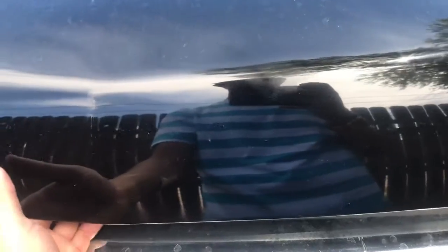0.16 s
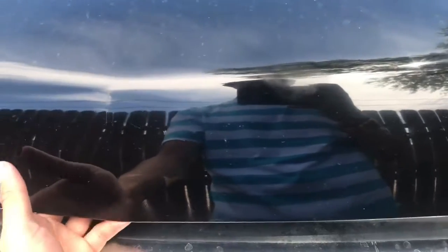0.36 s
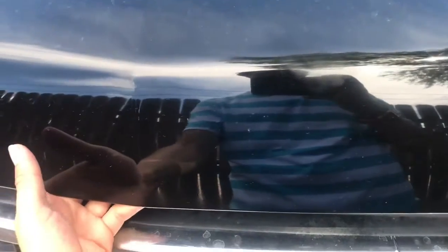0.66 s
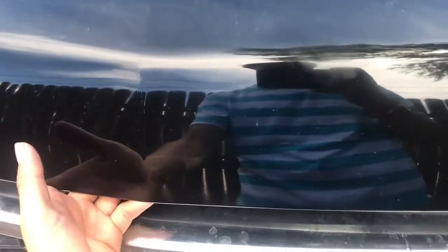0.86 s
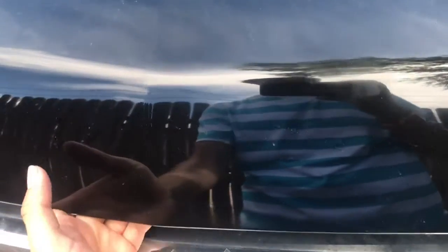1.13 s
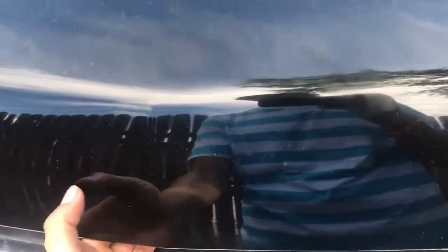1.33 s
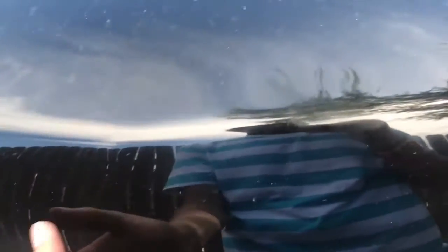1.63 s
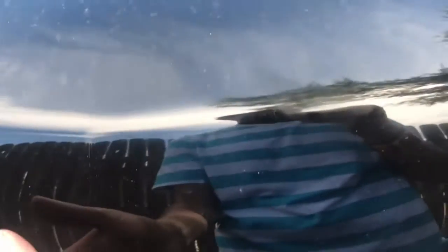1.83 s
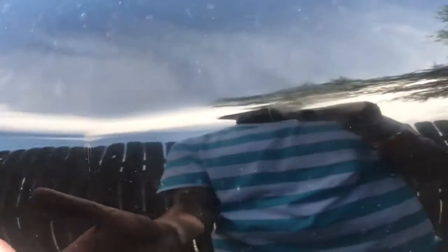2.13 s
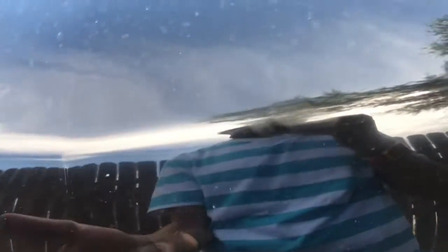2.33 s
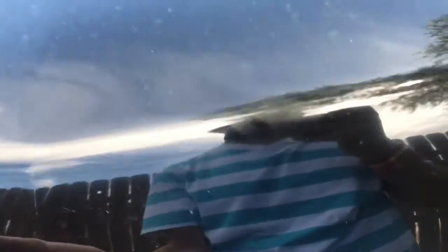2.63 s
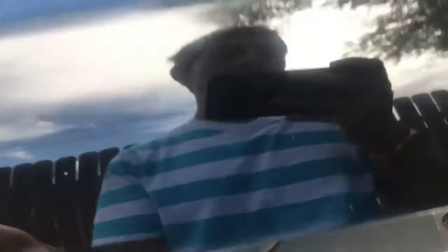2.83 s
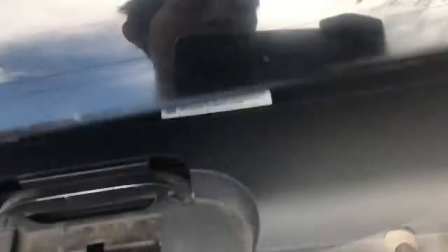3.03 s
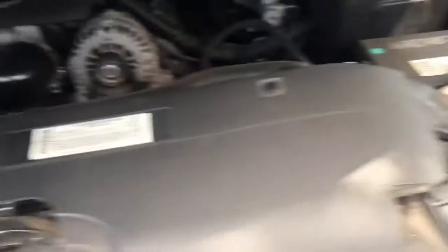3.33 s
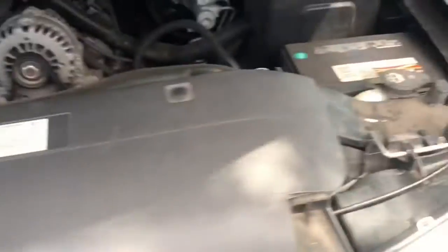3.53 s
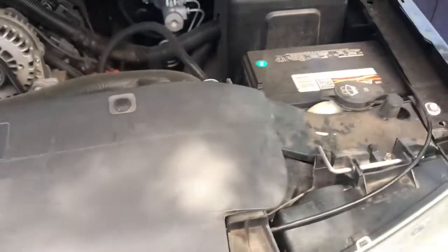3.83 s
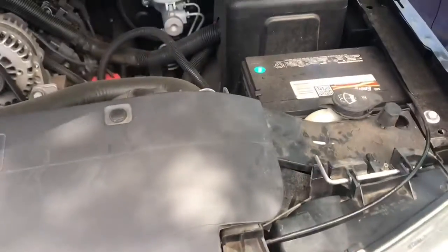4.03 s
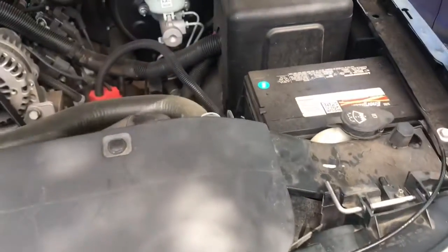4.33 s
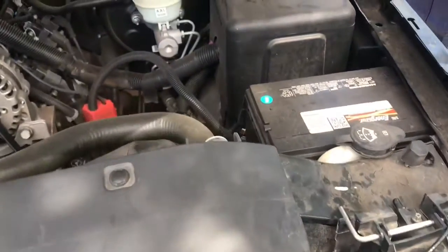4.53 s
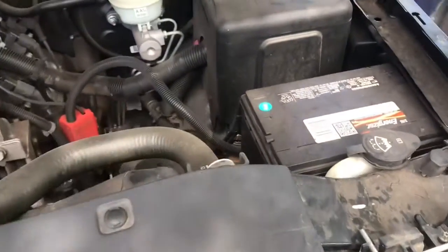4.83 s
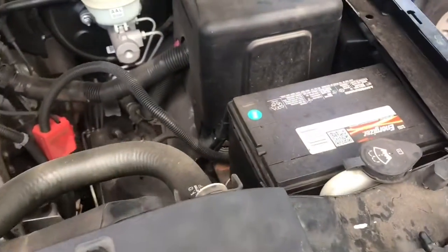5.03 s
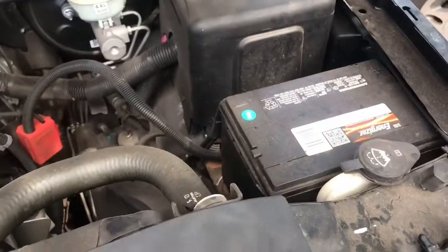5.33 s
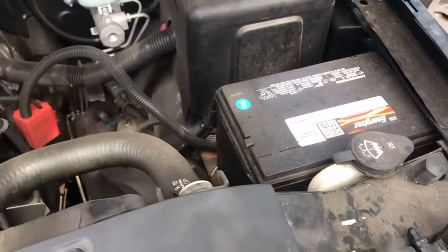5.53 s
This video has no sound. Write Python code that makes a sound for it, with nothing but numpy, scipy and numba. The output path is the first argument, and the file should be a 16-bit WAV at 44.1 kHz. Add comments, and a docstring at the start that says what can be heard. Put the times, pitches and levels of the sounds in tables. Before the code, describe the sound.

In a quiet yard with a faint rumble of far traffic, a truck's hood is opened by hand close to the microphone. A light ringing click and some fumbling lead to a loud clunk and twang from the latch, then another clunk and a few clicks. Air bumps the microphone as the hood swings up with a soft rub and small ticks. The thin steel panel thumps and booms several times as it comes to rest.

```python
"""The steel hood of a pickup, lifted by hand in a quiet yard, an arm's length from a phone's microphone.
The latch clicks and clunks, setting its safety catch and spring ringing; each knock rings the modes of the
thin panel, which booms as it rises and settles. Hand and hinges rub and hiss, with small ticks, faint
squeaks and a bright rustle. Air puffs on the microphone, and far traffic rumbles underneath."""
import sys
import numpy as np
from scipy import signal
from scipy.fft import rfft, irfft, next_fast_len
from scipy.io import wavfile
from scipy.ndimage import uniform_filter1d
from numba import njit

SR = 44100
rng = np.random.default_rng(int(sys.argv[2]) if len(sys.argv) > 2 else 0)


def dump_mix(stems):
    """Bounce the given channels to the path in sys.argv[1] as a 16-bit WAV at rate SR."""
    frames = np.atleast_2d(stems).T  # one column per channel
    limited = np.clip(frames, -1, 1)  # hard clip at full scale
    pcm = np.round(limited * 32767).astype(np.int16)
    wavfile.write(sys.argv[1], SR, pcm)


N = 250388
TOP_HZ = 16400  # the phone's upper limit
FREE_FROM_S = 2.7  # the hood is latched until here, then hangs free on its hinges

# rumble of far traffic and the moving panel: (frequency [Hz], relative level [dB])
RUMBLE_SPECTRUM = [(12, -38.5), (24, -14), (42, 1), (80, 0), (112, -2.5), (216, -4.5), (236, -12),
                   (282, -6.5), (441, -13), (475, -16), (700, -22.5), (910, -51.5), (1540, -120)]
# its rise and fall at the microphone: (time [s], level [dB])
RUMBLE_LEVEL = [(0, -55), (.3, -63.5), (1.37, -61.5), (1.86, -55), (2.02, -45), (2.22, -60), (2.62, -58.5),
                (2.76, -58), (2.95, -51.5), (3.14, -62), (3.3, -54), (3.44, -56), (3.9, -60), (4.45, -58),
                (4.66, -59.5), (5.2, -47.5), (5.44, -59.5), (5.68, -56)]
# friction of hand and hinges, a low rub and a high hiss: (frequency [Hz], relative level [dB])
RUB_SPECTRUM = [(180, -29.5), (300, 2), (333, -2), (417, -11), (536, -10.5), (580, -11.5), (670, -4.5),
                (1210, -4.5), (7000, -24), (9100, -49), (15400, -120)]
HISS_SPECTRUM = [(2350, -37.5), (4000, 1), (4390, -0.5), (4930, -1.5), (8800, -1.5), (10400, -5.5),
                 (13200, -2.5), (16000, -9.5)]
# rubbing strokes: (start [s], end [s], swell [s], fade [s], rub level [dB], hiss level [dB])
STROKES = [(1.4, 1.66, 0.1, 0.15, -75, -78.5), (1.702, 2.682, 0.23, 0.024, -66.5, -72),
           (2.705, 3.202, 0.1, 0.14, -72, -89.5), (3.546, 3.95, 0.28, 0.14, -67.5, -86),
           (3.846, 4.52, 0.041, 0.15, -67, -80), (4.632, 5.304, 0.35, 0.14, -64, -72.5),
           (5.303, 5.681, 0.096, 0.026, -73, -83)]
# thin rustle as the hood swings up: (start [s], end [s], level [dB])
RUSTLE = (3.86, 4.36, -71)
# air on the microphone: (time [s], level [dB], frequency [Hz], length [cycles])
AIR_PUFFS = [(3.186, -44, 69, 1.98), (3.244, -35.5, 143, 1.9), (3.319, -39, 202, 2.6),
             (3.323, -37, 75, 1.9), (3.37, -30.5, 281.4, 1.7), (3.384, -43.5, 111.4, 2),
             (3.489, -45.5, 236, 2.2), (3.516, -39.5, 203, 2), (3.53, -36, 161, 1.7),
             (3.586, -45, 247.5, 2.7), (3.765, -38, 181, 1.84), (3.775, -43, 92.8, 1.5),
             (3.945, -47.5, 149, 1.9)]
# hinges near the top of the swing: (start [s], end [s], pitch [Hz], level [dB])
HINGE_SQUEAKS = [(4.18, 4.27, 3000, -72), (4.9, 5.08, 6300, -73), (4.87, 5.02, 1750, -67),
                 (4.96, 5.08, 1250, -66)]
# ticks of springs, rods and grit: (time [s], relative level [dB], pitch [Hz])
TICKS = [(1.458, -63, 2980), (1.826, -59, 7600), (1.865, -56, 7200), (2.044, -54, 6920), (3.686, -56, 2150),
         (3.897, -70, 9020), (4.041, -59, 9500), (4.065, -60, 3880), (4.094, -58.5, 10100),
         (4.2, -62, 10100), (4.845, -60, 12770), (4.946, -50, 15200), (5.055, -46.5, 13000),
         (5.465, -46, 11280), (5.466, -48.5, 6930), (5.265, -72, 7060), (5.528, -61.5, 10760)]
# long tones of latch spring and rod, short ones of the safety catch: (frequency [Hz], level [dB], t60 [s])
SPRING_MODES = [(556, -54, 1.9), (1084, -63, 1.9), (1515, -54, .7), (1572, -44, .36), (1835, -59, .65),
                (2672, -67, 1.2), (3138, -66, .9), (3520, -68, .8)]
CATCH_MODES = [(334, -15, 0.21), (563.5, 3.5, 0.14), (672, -3, 0.091), (1030, -6.5, 0.11),
               (1305, -14.5, 0.22), (1605, -1.5, 0.069), (1740, -1, 0.082), (2480, -18.5, 0.057),
               (2840, -6.5, 0.065), (3360, -15, 0.076), (3840, -4.5, 0.051), (4420, -12, 0.084),
               (5220, -9.5, 0.045), (6640, -18, 0.044)]
# blows on each: (time [s], level [dB], centre [Hz], fall either side [dB/octave])
SPRING_JOLTS = [(0.016, -8, 1835, 45), (1.888, -1, 1000, 0)]
CATCH_BLOWS = [(1.888, -23.5, 600, 0), (2.257, -21.5, 1710, 2.5), (2.375, -42, 4000, 2),
               (2.507, -35.5, 5600, 6), (2.519, -38.5, 4000, 5)]
# knocks on latch and panel, from sharp metal blows to soft pushes of the hand: (time [s], level [dB],
# centre [Hz], fall below [dB/octave], fall above [dB/octave], contact [ms], damping [x decay rate])
HOOD_BLOWS = [(0.016, -32, 2630, 2.6, 6, 0.22, 1.24), (0.026, -39.5, 295, 5, 3, 1.9, 1.3),
              (0.068, -59.5, 666, -1, 3, 3.4, 0.81), (0.985, -50, 340, 5, 5, 0.87, 4.2),
              (1.078, -55, 624, 4, 23, 10, 0.68), (1.452, -53, 1350, 3.5, 8.5, 0.83, 1.7),
              (1.48, -55, 246, 5, 4.5, 2, 0.73), (1.585, -60, 1520, 7, 7, .3, 0.45),
              (1.596, -45, 190, 4, 7.5, 1.5, 0.68), (1.62, -48, 1500, 2, 6, 0.25, 1.3),
              (1.752, -49.5, 342, 13, 5.5, 3, 2.2), (1.812, -50, 1530, 8, 12, .8, 1.7),
              (1.827, -52.5, 2700, 3, 6, .25, 2.6), (1.856, -43, 184, 15, 2.5, 10, 0.22),
              (1.882, -19, 345, 2, 3.5, .7, 1.2), (1.885, -14, 2800, 2.5, 1.3, .8, 1.1),
              (1.895, -12.5, 710, 8, 4.5, 1.3, 1.05), (1.911, -33.5, 340.3, 0, 1.5, 0.79, 0.49),
              (2.015, -36.5, 200, 33, 4, 4.7, 1.03), (2.257, -21.5, 377, 7.5, 1.26, 0.15, 0.95),
              (2.374, -43, 620, 5, 4, .69, 0.67), (2.507, -30.5, 5720, 4.5, 11, 0.97, 0.93),
              (2.519, -36, 1670, 5, 6.5, 0.4, 0.83), (2.545, -45, 227, 1, 10, 4, 0.74),
              (2.716, -56.5, 334, 3.5, 7, 3.8, 0.79), (2.81, -37, 304.4, 8, 9.5, 4.1, 0.57),
              (2.914, -50, 301, 4.5, 9, 2.1, 0.48), (2.942, -54, 331, 0, 7, 3.3, 1.1),
              (3.048, -52, 340, 0.5, 7.5, 1.2, 1.5), (3.716, -48, 295.3, 2.5, 6, 0.93, 1.75),
              (3.756, -55.5, 1395, -1, 6.5, 3, 0.77), (3.86, -51.5, 1390, 2.5, 10.5, 1.2, 0.7),
              (4.429, -47, 337, 1.9, 5, 7.2, 0.65), (4.693, -52.5, 2740, -1.96, 8, 1.8, 0.63),
              (5.078, -20.5, 272, 10.5, 5.5, 0.79, 0.71), (5.123, -20.5, 204, 18, 11, 2.5, 1.2),
              (5.122, -23.5, 880, 0.8, 5, 0.33, 0.78), (5.16, -28.5, 244, 5.5, 7.5, 3.5, 0.45),
              (5.193, -28.5, 231, 1, 8.5, 2.2, 0.99), (5.286, -52.5, 670, 0, 7, 2.4, 0.6),
              (5.368, -51.5, 1377, 0, 7, 4.6, 1.14), (5.476, -34.5, 345, 3.5, 14.5, 1.54, 0.75)]
# bands over which a knock spreads its energy: (edge [Hz])
BAND_EDGES = [40, 130, 260, 450, 1000, 2000, 4000, 8000, 16000]
# how readily the panel rings, latched and free: (frequency [Hz], gain [dB])
LATCHED_RESPONSE = [(72, -2), (184, 3), (342, 4), (670, 0), (1400, 2.47), (2800, 3.5), (5600, -3),
                    (11300, -2)]
FREE_RESPONSE = [(72, 0.3), (184, 2.06), (342, 2.5), (670, 3.5), (1400, 6.5), (2800, 1.5), (5600, 3.5),
                 (11300, 3)]
# the panel's clear modes, latched and free: (frequency [Hz], relative level [dB], t60 [s])
LATCHED_MODES = [(53.7, -11.5, 0.24), (90, -22.5, 0.15), (174.5, -5.5, 0.22), (233.5, -12.5, 0.28),
                 (279.8, -2, 0.19), (357.3, -3.5, 0.15), (405, -6, 0.12), (560, -16.5, 0.48),
                 (615, -7, 0.14), (719.4, -2.5, 0.14), (915, -20, 0.53), (1038, -20, 0.29),
                 (1153, -8.5, 0.1), (1286, -19, 0.27), (1564, -10.5, 0.1), (1700, -13.5, 0.078),
                 (1665, -2.5, 0.054), (1770, -17.5, 0.04), (2660, -25.5, 0.23), (3210, -19, 0.1),
                 (3220, -11.5, 0.007), (3950, -17, 0.057), (5030, -27, 0.0092), (5480, -25.5, 0.093)]
FREE_MODES = [(52.74, -6, 0.24), (83.35, -9, 0.38), (123.4, -14, 0.34), (202.8, -10.5, 0.21),
              (234.8, -2, 0.17), (283.2, -3, 0.18), (309, -2, 0.17), (396.4, -11, 0.17),
              (578, -27.5, 0.042), (832, -24, 0.03), (1198, -13, 0.058), (1355, -17, 0.017)]
# balance of the clear modes and the dense ones between them: (frequency [Hz], gain [dB])
CLEAR_GAIN = [(200, 1), (600, -2.56), (1500, -3.5), (4000, -7.5)]
DENSE_GAIN = [(250, -14), (700, -12), (2500, -8), (8000, -5)]
# decay of the dense modes before a knock's damping: (frequency [Hz], t60 [s])
DENSE_T60 = [(60, 0.21), (160, 0.35), (420, 0.2), (1100, 0.14), (2910, 0.11), (7680, 0.068), (14000, .05)]


def amp(db):
    """Decibels to gain."""
    return 10 ** (np.asarray(db) / 20)


def along(table, hz):
    """Read a (frequency, value) table on a log-frequency axis."""
    f, v = np.transpose(table)
    return np.interp(np.log(hz), np.log(f), v)


def noise(gain):
    """Noise of rms 1 whose spectrum is shaped by gain(Hz)."""
    size = next_fast_len(N)
    hz = np.maximum(np.arange(size // 2 + 1) * SR / size, 1)
    x = irfft(rfft(rng.standard_normal(size)) * gain(hz), size)[:N]
    return x / x.std()


def flicker(rate_hz, spread_db):
    """A gain that wanders smoothly between random levels."""
    hold = int(SR / rate_hz)
    steps = np.repeat(rng.standard_normal(N // hold + 1), hold)
    walk = uniform_filter1d(uniform_filter1d(steps, hold), hold)[:N]
    return amp(spread_db * walk / walk.std())


def grit(per_s, size_db, decay_ms):
    """Gain near 1 with brief random bursts, as grains catch and let go."""
    bursts = (rng.random(N) < per_s / SR) * amp(size_db * rng.exponential(size=N)) / 2
    gain = 1 + signal.lfilter([1], [1, -np.exp(-1000 / (decay_ms * SR))], bursts)
    return gain / np.sqrt(np.mean(gain ** 2))


def swell(start, end, swell_s, fade_s):
    """An envelope that rises, holds and fades in straight lines."""
    t = np.arange(N) / SR
    return np.clip(np.minimum((t - start) / swell_s, (end - t) / fade_s), 0, 1)


@njit
def add_modes(out, time_s, hz, t60, gain, rise_s):
    """Add fading sines that swell over the contact time; a complex gain sets level and phase."""
    start = int(time_s * SR)
    rise_step = np.exp(-1 / (rise_s * SR))
    for k in range(len(hz)):
        step = np.exp(2j * np.pi * hz[k] / SR - np.log(1000) / (t60[k] * SR))
        phasor, rise_left = gain[k], 1.
        for i in range(start, min(len(out), start + int(t60[k] * SR))):
            out[i] += (1 - rise_left) * phasor.imag
            phasor, rise_left = phasor * step, rise_left * rise_step


def rumble(split_hz=140):
    """Traffic far beyond the yard and the panel moving close by; deep and upper parts flicker apart."""
    lowpass = lambda f: 1 / np.sqrt(1 + (f / split_hz) ** 6)
    deep = noise(lambda f: amp(along(RUMBLE_SPECTRUM, f)) * lowpass(f))
    deep *= flicker(rate_hz=5, spread_db=2.2)
    upper = noise(lambda f: amp(along(RUMBLE_SPECTRUM, f)) * np.sqrt(1 - lowpass(f) ** 2))
    upper *= flicker(rate_hz=20, spread_db=.53)
    level_db = np.interp(np.arange(N) / SR, *np.transpose(RUMBLE_LEVEL))
    return (deep + amp(-5) * upper) * amp(level_db)


def friction(still_rub_db=-72, still_hiss_db=-79):
    """Hand and hinges rub and hiss in gritty strokes, over a faint floor that stays when nothing moves."""
    rub_gain, hiss_gain = amp(still_rub_db), amp(still_hiss_db)
    for start, end, swell_s, fade_s, rub_db, hiss_db in STROKES:
        stroke = swell(start, end, swell_s, fade_s)
        rub_gain = np.hypot(rub_gain, amp(rub_db) * stroke)
        hiss_gain = np.hypot(hiss_gain, amp(hiss_db) * stroke)
    rub = noise(lambda f: amp(along(RUB_SPECTRUM, f))) * flicker(rate_hz=29, spread_db=.78)
    rub *= grit(per_s=45, size_db=1.3, decay_ms=4.4)
    hiss = noise(lambda f: amp(along(HISS_SPECTRUM, f))) * flicker(rate_hz=24, spread_db=.71)
    hiss *= grit(per_s=8.9, size_db=1.3, decay_ms=2.8)
    return rub * rub_gain + hiss * hiss_gain


def rustle(above_hz=7500):
    """Gritty noise in the top octave swells quickly and fades as the hood swings up."""
    start, end, db = RUSTLE
    gain = amp(db) * swell(start, end, swell_s=.06, fade_s=.15) * grit(per_s=70, size_db=4.9, decay_ms=2.2)
    return gain * noise(lambda f: 1 / (1 + (above_hz / f) ** 6))


def air_puffs():
    """Low swings of pressure right on the microphone, about two cycles each."""
    out = np.zeros(N)
    for time_s, db, hz, cycles in AIR_PUFFS:
        t = np.arange(int(cycles / hz * SR)) / SR
        at = int(time_s * SR)
        out[at:at + len(t)] += amp(db) * np.sin(2 * np.pi * hz * t) * np.hanning(len(t))
    return out


def hinge_squeaks(half_width_hz=130):
    """Dry pivots give faint, narrow, unsteady tones."""
    out = np.zeros(N)
    for start, end, hz, db in HINGE_SQUEAKS:
        first, last = int(start * SR), int(end * SR)
        tone = noise(lambda f: 1 / (1 + ((f - hz) / half_width_hz) ** 2))
        out[first:last] += amp(db) * np.hanning(last - first) * tone[first:last]
    return out


def ticks(count=80, t60_s=.013):
    """Springs, rods and grit tick, each ringing a wide cluster of short modes around its pitch."""
    out = np.zeros(N)
    for time_s, db, pitch_hz in TICKS:
        real, imag, detune = rng.standard_normal((3, count))
        hz = pitch_hz * np.exp(.28 * detune)
        gain = amp(db - 17.5) * (real + 1j * imag) * (hz < TOP_HZ)
        add_modes(out, time_s, hz, np.full(count, t60_s), gain, rise_s=.0004)
    return out


def latch_part(modes, blows):
    """A small steel part, spring or catch, rings its few modes at every blow."""
    out = np.zeros(N)
    hz, mode_db, t60 = np.transpose(modes)
    signs = (-1 + 0j) ** np.arange(len(hz))
    for time_s, db, centre_hz, fall in blows:
        gain = signs * amp(db + mode_db - fall * np.abs(np.log2(hz / centre_hz)))
        add_modes(out, time_s, hz, t60, gain, rise_s=.0004)
    return out


def clear_gains(hz, mode_db, centre_hz, band_db, focus_db=11, focus_octaves=.07):
    """The panel's clear modes share each band's energy; a knock favours those at its centre frequency."""
    weight = amp(mode_db + focus_db * np.exp(-(np.log2(hz / centre_hz) / focus_octaves) ** 2))
    band = np.digitize(hz, BAND_EDGES) - 1
    share = weight / np.sqrt(np.bincount(band, weight ** 2)[band])
    signs = (-1 + 0j) ** np.arange(len(hz))
    return signs * share * amp(along(CLEAR_GAIN, hz) + band_db[band])


def hood(count=520, scatter_db=1.6, snap_above_hz=5500, snap_t60_s=.035, soft_ms=1.5):
    """The thin steel panel at arm's length: each knock rings its clear modes and a new mix of dense ones."""
    out, edges = np.zeros(N), np.array(BAND_EDGES)
    band_hz = np.sqrt(edges[1:] * edges[:-1])
    position = (np.arange(count) + rng.random(count)) / count
    dense_hz = 60 + 15800 * position ** 1.6
    spacing_hz = 1.6 * 15800 / count * position ** .6
    dense_t60 = along(DENSE_T60, dense_hz) * np.exp(.038 * rng.standard_normal(count))
    dense_db = along(DENSE_GAIN, dense_hz) + 2.6 * rng.standard_normal(count)
    for time_s, db, centre_hz, fall_below, fall_above, contact_ms, damping in HOOD_BLOWS:
        free, rise_s = time_s > FREE_FROM_S, contact_ms / 1000
        real, imag, scatter = rng.standard_normal((3, count))
        octaves = np.log2(band_hz / centre_hz)
        band_db = db + np.where(octaves < 0, fall_below, -fall_above) * octaves
        band_db += along(FREE_RESPONSE if free else LATCHED_RESPONSE, band_hz)

        hz, mode_db, t60 = np.transpose(FREE_MODES if free else LATCHED_MODES)
        clear = clear_gains(hz, mode_db, centre_hz, band_db)
        clear *= amp(scatter_db * scatter[-len(hz):])  # each knock lands elsewhere
        add_modes(out, time_s, hz * (1 + .012 * scatter[:len(hz)]), t60 / damping, clear, rise_s)

        db_per_hz = list(zip(band_hz, band_db - 10 * np.log10(np.diff(edges))))
        dense = (real + 1j * imag) * np.sqrt(spacing_hz) * amp(along(db_per_hz, dense_hz) + dense_db)
        add_modes(out, time_s, dense_hz, dense_t60 / damping, dense, rise_s)

        # the treble cracks briefly at contact, hardly at all when the contact is soft
        snap = 1j * amp(4.5) * dense / (1 + (snap_above_hz / dense_hz) ** 4)
        snap /= 1 + (contact_ms / soft_ms) ** 4
        snap_hz = dense_hz * (1 + .021 * scatter)
        add_modes(out, time_s, snap_hz, np.full(count, snap_t60_s), snap, rise_s / 2)
    return out


def scene():
    """Hood, latch and yard, all at the one microphone."""
    steel = hood() + latch_part(CATCH_MODES, CATCH_BLOWS) + latch_part(SPRING_MODES, SPRING_JOLTS)
    return (steel + ticks() + hinge_squeaks() + air_puffs() + rumble() + friction() + rustle())[None]


def record(dry):
    """The microphone loses the deepest bass; the phone cuts the top."""
    heard = signal.sosfilt(signal.butter(3, 36, "high", fs=SR, output="sos"), dry)
    return signal.sosfilt(signal.ellip(10, .2, 70, TOP_HZ, fs=SR, output="sos"), heard)


dry = scene()
out = record(dry)
dump_mix(out)
```